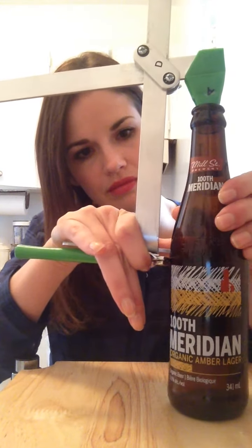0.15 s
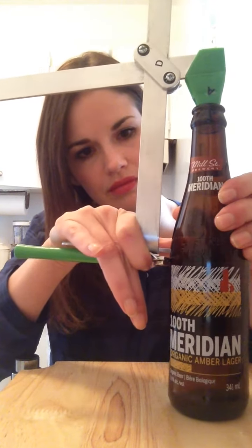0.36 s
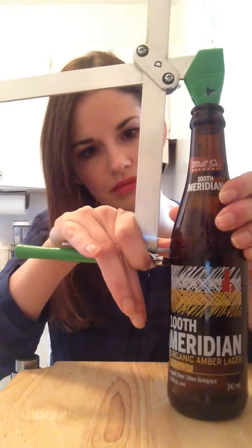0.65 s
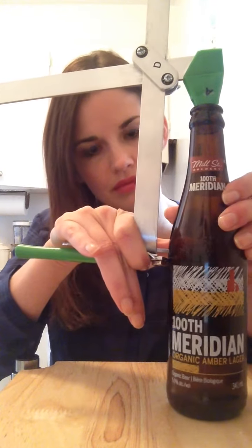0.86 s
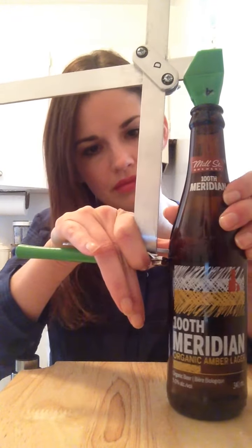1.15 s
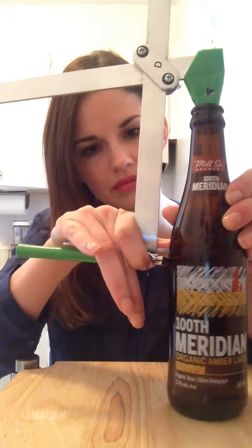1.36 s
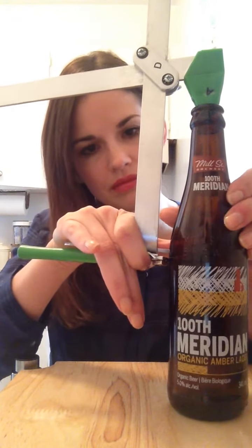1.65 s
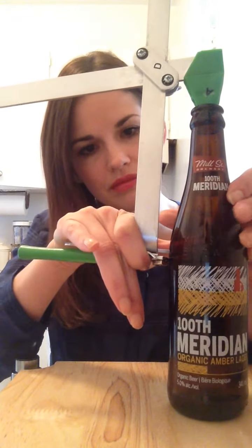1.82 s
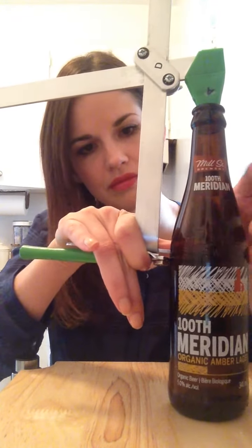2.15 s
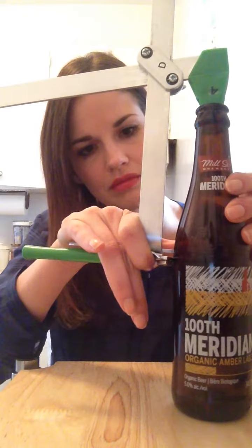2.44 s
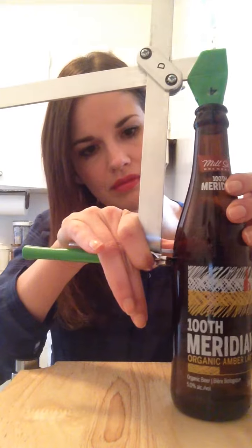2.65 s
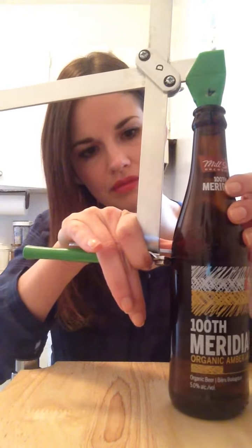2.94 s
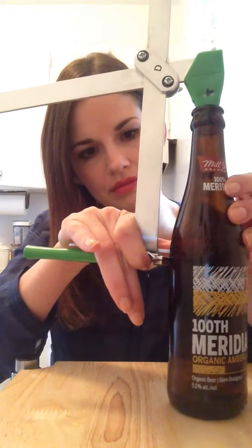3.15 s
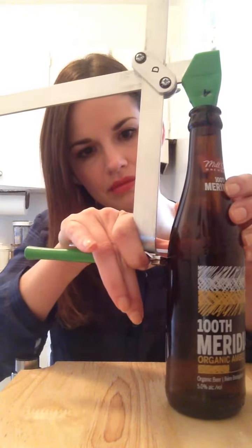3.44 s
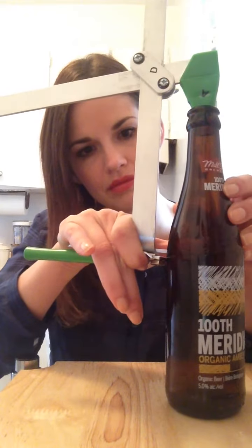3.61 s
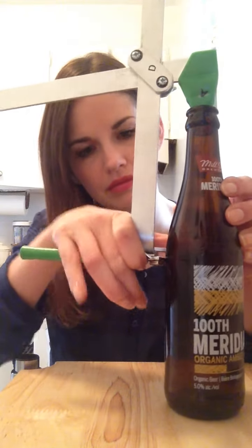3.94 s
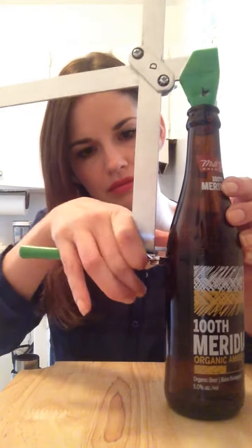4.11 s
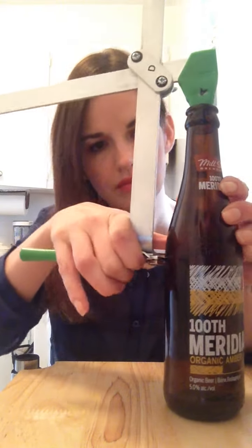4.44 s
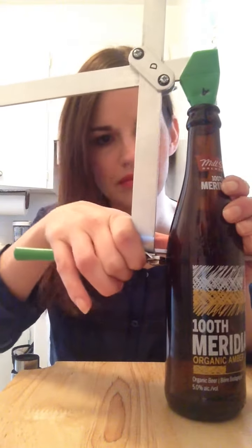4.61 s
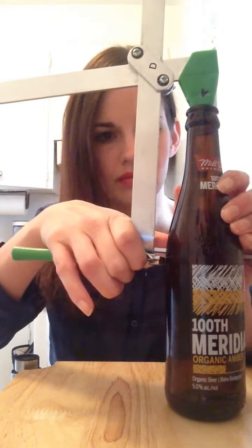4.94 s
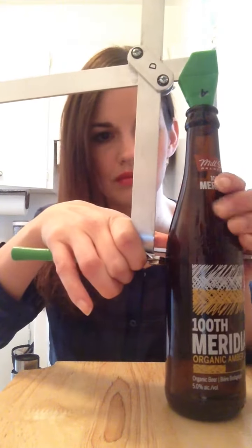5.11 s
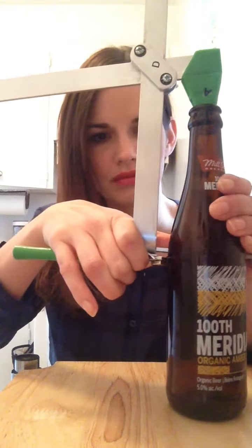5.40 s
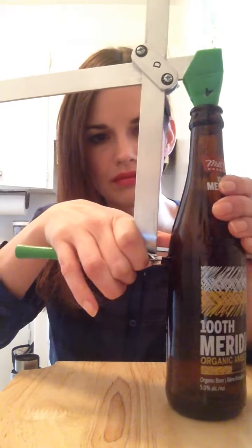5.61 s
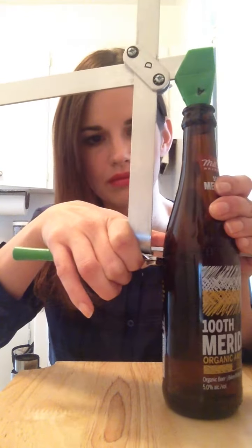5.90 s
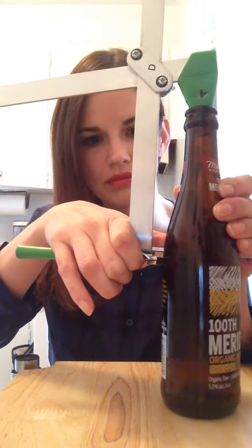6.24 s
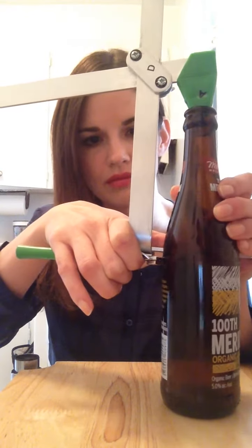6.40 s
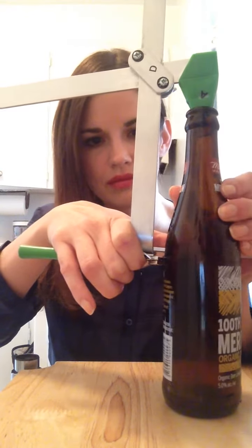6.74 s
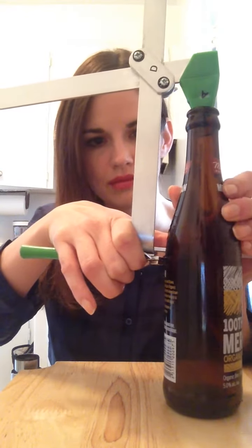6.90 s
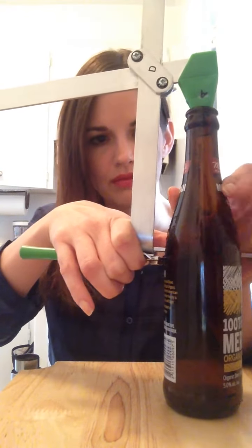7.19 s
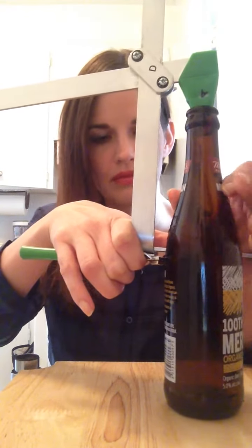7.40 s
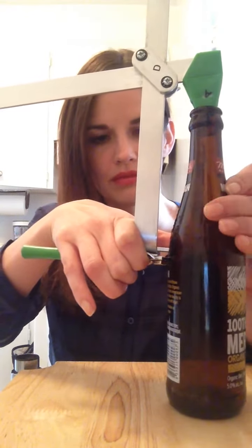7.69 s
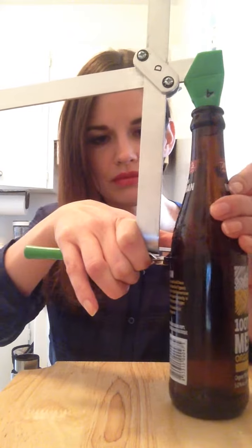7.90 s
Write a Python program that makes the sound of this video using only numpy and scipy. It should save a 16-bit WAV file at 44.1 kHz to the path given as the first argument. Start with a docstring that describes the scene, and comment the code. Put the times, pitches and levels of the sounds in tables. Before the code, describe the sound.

A quiet small room holds a steady low hum, around 175 Hz, with soft dull air. At 0.4 s there is a barely audible tick; at 0.75-0.9 s a tight cluster of bright, brittle glass cracks and gritty crunch, as the wheel scores the bottle. A second short crunch comes at 1.3-1.5 s with a dull wooden bump, then faint finger swishes, small bumps and dry joint ticks until 4 s. At 4.26 s a quick grind leads into a loud, sharp clink at 4.3 s, metal arm on glass, ringing briefly with a hissy shimmer. Small ticks follow at 4.55 s and 5.2 s. From 5.6 to 6.4 s irregular crisp chips snap over fine grit; more at 6.6-7.0 s, ending near a dry tick at 7.14 s. Faint swishes and tiny crackles remain until 8 s. Close microphone, short reverberation.

```python
"""In a small room, a glass bottle is turned by hand against the wheel of a bottle cutter on a wooden table.
Each push grinds grit as a random train of grains and breaks out chips: noise cracks that ring the wall's modes.
Once the metal arm snaps against the bottle with a loud clink, made of both sets of modes, a crack and a shimmer.
Faint finger swishes, joint ticks and table bumps are shaped noise; an appliance adds tones and a rush of air.
The recorder's gain ducks on loud sounds, most after the clink, and creeps back."""
import sys
import numpy as np
from scipy import signal
from scipy.fft import rfft, irfft
from scipy.io import wavfile
from scipy.ndimage import uniform_filter1d

SR = 44100
rng = np.random.default_rng(int(sys.argv[2]) if len(sys.argv) > 2 else 0)


def bounce(signal):
    """Save signal as a 16-bit WAV file at the path given by the first command-line argument."""
    frames = np.transpose(np.atleast_2d(signal))
    limited = np.clip(frames, -1, 1)
    pcm = np.round(limited * 32767).astype(np.int16)
    wavfile.write(sys.argv[1], SR, pcm)


N = 355446
TIME = np.arange(N) / SR
RING_TIME = TIME[:SR // 4]


def from_db(db):
    """Level: amplitude gain is ten to the power of decibels over twenty."""
    return 10 ** (np.asarray(db) / 20)


def rms_one(x):
    """Normalisation: scale a signal to unit rms."""
    return x / np.sqrt(np.mean(x ** 2) + 1e-20)


def at_hz(points, hz):
    """Interpolation on a logarithmic frequency axis."""
    table_hz, value = np.transpose(points)
    return np.interp(np.log(np.maximum(hz, 1)), np.log(table_hz), value)


def filtered(x, edge_hz, kind, order=2):
    """Causal Butterworth filtering: a maximally flat passband."""
    edge_hz = np.clip(edge_hz, 10, .45 * SR)
    return signal.sosfilt(signal.butter(order, edge_hz, kind, fs=SR, output="sos"), x)


def noise(spectrum, size, resonances=()):
    """Spectral shaping: white noise coloured by a spectrum and lifted at each resonance; rms 1."""
    hz = np.fft.rfftfreq(size, 1 / SR)
    power = 1
    for centre_hz, width_hz, lift_db in resonances:
        power = power + (from_db(lift_db) ** 2 - 1) / (1 + (2 * (hz - centre_hz) / width_hz) ** 2) ** 2
    white = rfft(rng.standard_normal(size))
    return rms_one(irfft(white * from_db(at_hz(spectrum, hz)) * np.sqrt(power), size))


def drift(rate_hz):
    """Slow random modulation: straight lines between random knots of spread 1."""
    knots = rng.standard_normal(400)
    return np.interp(TIME * rate_hz, np.arange(len(knots)), knots)


def add(track, s, sound):
    """Superposition: mix a sound into the track at time s."""
    start = int(np.clip(round(s * SR), 0, N - 1))
    track[start:start + len(sound)] += sound[:N - start]


def dying(t60):
    """Exponential decay: the level falls 60 dB in t60."""
    return from_db(-60 * RING_TIME / t60)


def rings(modes, size=None):
    """Modal synthesis: one exponentially dying sine for each mode."""
    t = RING_TIME[:size]
    return np.array([from_db(db - 60 * t / t60) * np.sin(2 * np.pi * hz * t) for hz, db, t60 in modes])


def alternating(modes, size=None):
    """Modal polarity: ringing modes, neighbours swinging in opposite directions."""
    return (-1) ** np.arange(len(modes))[:, None] * rings(modes, size)


def struck(modes, scatter_db, detune):
    """Modal excitation: grip and contact give every mode a slightly different strength and pitch."""
    chance = rng.standard_normal((len(modes), 2))
    varied = [(hz * (1 + detune * a), db + scatter_db * b, t60)
              for (hz, db, t60), (a, b) in zip(modes, chance)]
    return alternating(varied, size=SR // 12)


def crack(spectrum, t60, rise_s=0.):
    """Brittle fracture: tiny breaks and crowded modes as decaying noise; a running crack takes time to swell."""
    swell = 1 - np.exp(-RING_TIME / max(rise_s, 1e-6))
    return noise(spectrum, len(RING_TIME)) * dying(t60) * swell


# Colour of the room air. Each row: frequency in Hz, relative density in dB per Hz.
AIR_SPECTRUM = [(20, -19.5), (45, -9), (70, 0.5), (120, -0.5), (240, -0.5), (400, -1.5), (620, -5.5),
                (900, -8), (1020, -14), (2000, -20), (3200, -29.5), (5500, -36.5), (9000, -39.5),
                (15000, -42)]
# Room resonances stirred by the appliance. Each row: frequency in Hz, width in Hz, lift over the air in dB.
ROOM_RESONANCES = [(88, 12, 5.7), (149.9, 16, 14.35), (174.4, 50, 13.65), (202, 16, 12), (275.8, 28, 8.9),
                   (295.5, 29, 11), (374, 6.7, 2.7), (453, 26, 9.3), (474.6, 40, 4.5), (530, 30, 2.7),
                   (922, 41, 4.6), (1263, 40, 4.8)]
# Tones of the appliance. Each row: frequency in Hz, rms level in dB; both waver.
MOTOR_TONES = [(175.3, -51.5), (354.5, -68.5), (1066, -80.5), (1124, -82.5)]
AIR_DB = -51


def appliance(waver=0.073, wander_hz=0.694, air_waver_db=.5):
    """Tonal and broadband noise: motor tones that waver a little, over air coloured by room resonance."""
    # the wander is that of the first tone; the others keep their frequency ratios to it
    turns = TIME + np.cumsum(wander_hz * drift(4.5)) / SR / MOTOR_TONES[0][0]
    tones = np.zeros(N)
    for hz, db in MOTOR_TONES:
        loudness = from_db(db) * np.sqrt(2) * (1 + waver * drift(5.0))
        tones += loudness * np.sin(2 * np.pi * hz * turns)
    air_level = from_db(AIR_DB + air_waver_db * drift(3.2))
    return tones + air_level * noise(AIR_SPECTRUM, N, ROOM_RESONANCES)


# Fingers slide over the glass to take a new grip.
# Each row: time of the strongest rub in seconds, length in seconds, level in dB.
FINGER_SLIDES = [(1.24, 0.085, -86), (2.008, 0.04, -79), (2.25, .3, -89), (3.99, 0.064, -91),
                 (5.042, 0.073, -75.5), (7.198, 0.13, -79.5), (7.98, 0.15, -91)]


def fingers(low_hz=7000, high_hz=15500):
    """Sliding friction: dry skin on glass gives a faint, high swish."""
    pressure = sum(from_db(db) * np.exp(-(2 * (TIME - s) / length) ** 2) for s, length, db in FINGER_SLIDES)
    return pressure * rms_one(filtered(rng.standard_normal(N), [low_hz, high_hz], "band"))


def touch(peak_db, hz, t60, octaves):
    """Damped impact: a decaying noise burst in a band, so its pitch is vague."""
    edges_hz = hz * 2 ** (octaves * np.array([-.5, .5]))
    burst = filtered(rng.standard_normal(len(RING_TIME)) * dying(t60), edges_hz, "band")
    return from_db(peak_db) * burst / np.abs(burst).max()


# Dry ticks of play in the cutter's joints.
# Each row: start in seconds, peak level in dB, centre in Hz, width in octaves.
TICKS = [(.673, -54, 10500, 1.2), (1.217, -56, 11000, 1.1), (2.094, -53, 7700, 0.83),
         (2.308, -52, 7300, 0.2), (4.118, -56, 9500, 1.2), (4.277, -48.5, 11000, 1.2),
         (4.553, -53.5, 9500, 3.5), (4.561, -48, 10030, 1.84), (5.176, -49.5, 7900, 2.2),
         (5.442, -52, 13080, 1), (7.144, -41, 9880, 1.5), (7.459, -59, 13500, 0.86)]


def joint_ticks(t60=0.0057):
    """Impact in loose joints: quickly damped, dry ticks."""
    out = np.zeros(N)
    for s, db, hz, octaves in TICKS:
        add(out, s, touch(db, hz, t60, octaves))
    return out


# The bottle's base shifts on the table. Each row: start in seconds, peak level in dB, pitch in Hz,
# t60 in seconds, width in octaves, peak level of the wall's ring in dB.
BASE_BUMPS = [(0.815, -46, 570, 0.11, 0.6, -62), (0.850, -48, 593, 0.16, 0.43, -60),
              (1.436, -40, 594, 0.042, 0.39, -59), (1.443, -45, 716, 0.041, 0.28, -57),
              (1.744, -49.5, 584, 0.066, 0.64, -46), (1.824, -49, 1510, 0.034, 0.21, -56.5),
              (2.300, -50, 585, 0.064, 0.69, -58), (4.274, -41.5, 620, 0.11, 0.58, -56.5),
              (4.3005, -26, 573, 0.045, 0.37, -44.5), (4.321, -34.5, 520, 0.019, 0.21, -49.5),
              (6.024, -43.5, 1280, 0.014, 1.4, -41.5), (6.2405, -47.5, 1350, 0.019, 1.3, -50),
              (6.935, -47.5, 695, 0.16, 0.46, -64)]


def table_bumps():
    """Impact on damped wood: dull bumps of the base against the table."""
    out = np.zeros(N)
    for s, db, hz, t60, octaves, _ in BASE_BUMPS:
        add(out, s, touch(db, hz, t60, octaves))
    return out


# Span in which the wheel passes between two places on the wall: start in seconds, end in seconds.
WHEEL_PASSAGE = (1.5, 5.6)


def turned(s):
    """Moving drive point: how far the wheel has come from its first place to its later one, 0-1."""
    return np.interp(s, WHEEL_PASSAGE, [0, 1])


# Modes of the bottle wall. Each row: frequency in Hz, t60 in seconds, level in dB with the wheel at its
# first place, level in dB at its later place, level in dB under the arm's blow.
BOTTLE_MODES = [(2480, .03, -25, -26, -40), (2900, .03, -22, -23, -28), (3784, .05, -12, -14, -6),
                (3880, .04, -7, -11, -6), (3955, .055, 0, 0, 0), (4030, .03, -13, -13, -14),
                (4160, .03, -12, -21, -13), (4400, .03, -22, -16, -18), (4620, .03, -18, -24, -26),
                (4750, .035, -16, -22, -8), (5001, .04, -25, -29, -27), (5560, .03, -15, -15, -25),
                (5750, .02, -19, -19, -22), (6020, .02, -22, -21, -28), (6700, .03, -11, -21, -30),
                (6850, .035, -8, -19, -20), (7030, .035, -8, -17, -22), (7550, .03, -15, -18, -18),
                (7847, .06, -9, -9, -8), (7965, .06, -8, -9, -8), (8280, .02, -8, -14, -24),
                (8480, .02, -11, -14, -26), (8750, .025, -14, -16, -22), (8910, .03, -14, -20, -12),
                (9040, .03, -11, -22, -24), (9580, .03, -15, -14, -26), (9700, .035, -8, -9, -17),
                (9880, .04, -10, -12, -3), (10030, .035, -4, -13, -14), (10230, .03, -9, -5, -12),
                (10410, .035, -20, -7, -5), (10660, .03, -16, -20, -22), (10900, .02, -14, -19, -28),
                (11200, .025, -17, -18, -28), (11620, .025, -25, -17, -28), (12040, .02, -24, -18, -30),
                (12510, .035, -17, -17, -21), (12680, .03, -15, -24, -28), (13400, .025, -14, -19, -23),
                (14000, .025, -17, -15, -21), (14140, .06, -10, -18, -26), (14600, .02, -15, -14, -30),
                (14830, .02, -11, -14, -24), (15050, .035, -9, -9, -15), (15230, .03, -15, -14, -26)]


def wall_modes(turn):
    """Modal coupling: the wheel's place on the wall decides how strongly it drives each mode."""
    return [(hz, first_db + turn * (later_db - first_db), t60)
            for hz, t60, first_db, later_db, _ in BOTTLE_MODES]


def jolts(contact_hz=4550):
    """Soft-contact excitation: the wall answers each bump of its base, mostly with its lowest modes."""
    out = np.zeros(N)
    ring = filtered(rings(wall_modes(1)).sum(axis=0), contact_hz, "low", order=4)
    for s, *_, ring_db in BASE_BUMPS:
        add(out, s, from_db(ring_db) * ring / np.abs(ring).max())
    return out


# Modes of the cutter's metal arm, the weak ones ringing on.
# Each row: frequency in Hz, relative level in dB, t60 in seconds.
ARM_MODES = [(509.4, -31, 0.07), (1150, -21.5, 0.05), (1640, -26.5, .03), (1931, -18.5, 0.024),
             (2363, -22, 0.036), (2520, -23, .03), (2750, -22.5, 0.034), (3100, -24, 0.045),
             (3480, -24, .025), (3780, -29, .3), (3840, -27.5, .22), (4000, -8, 0.024),
             (4020, -11.5, 0.019), (4330, -15.5, 0.022), (4770, -38.5, .18), (4990, -41, .2),
             (7656, -20, .025), (8570, -22, .022), (9800, -30.5, .14), (10400, -29.5, 0.15)]
# Colour of the crack of the arm's blow. Each row: frequency in Hz, relative density in dB per Hz.
BLOW_SPECTRUM = [(50, -62), (280, -19.5), (560, -7.5), (1400, -3.5), (1950, -2), (2500, -1), (3000, -3),
                 (3600, -5), (3800, 10), (4300, 5.5), (4750, -0.5), (5100, -13), (5700, -11.5),
                 (6450, -21.5), (7100, -8.5), (8000, -3), (8500, -10), (10300, -3), (11200, -18),
                 (15000, -11)]
# Crowded weak modes of glass and metal, fading together as a hiss.
# Each row: frequency in Hz, relative density in dB per Hz.
SHIMMER_SPECTRUM = [(500, -13.5), (1500, -4), (2500, 0), (3100, 2), (3550, 1.5), (3860, 19), (4200, 7.5),
                    (4500, 0.5), (4850, 6.5), (5500, -8.5), (6400, -12), (7200, 1.5), (9000, -1.5),
                    (10200, 2.5), (11400, -14), (12600, -3), (15000, -8.5)]
CLINK_S, CLINK_ARM_DB, CLINK_BOTTLE_DB, CLINK_CRACK_DB = 4.2993, -8, -10.5, -14
SHIMMER_DB, SHIMMER_T60_S = -30, 0.21


def clink():
    """Impact of two resonators: the arm snaps on the bottle with a crack, both rings and a fading shimmer."""
    wall = alternating([(hz, blow_db, t60) for hz, t60, *_, blow_db in BOTTLE_MODES]).sum(axis=0)
    arm = rings(ARM_MODES).sum(axis=0)
    body = from_db(CLINK_BOTTLE_DB) * wall + from_db(CLINK_ARM_DB) * arm
    burst = from_db(CLINK_CRACK_DB) * crack(BLOW_SPECTRUM, t60=0.03)
    shimmer = from_db(SHIMMER_DB) * crack(SHIMMER_SPECTRUM, SHIMMER_T60_S, rise_s=.004)
    out = np.zeros(N)
    add(out, CLINK_S, body + burst + shimmer)
    return filtered(out, 400, "high")   # the clink carries no low thump


# The hand turns the bottle in separate pushes.
# Each row: start in seconds, length before the decay in seconds, grit level in dB, rise in seconds.
HAND_PUSHES = [(0.433, 0.018, -78.5, .008), (0.789, 0.079, -53, 0.026), (1.19, 0.15, -76.5, 0.03),
               (1.415, 0.061, -62, 0.015), (1.646, 0.11, -75.5, 0.048), (3.938, 0.088, -75, 0.022),
               (4.261, 0.078, -44, 0.04), (5.41, 0.019, -68.5, 0.014), (5.598, 0.9, -70, 0.029),
               (5.76, 0.039, -63, .02), (5.86, 0.047, -61, 0.035), (6.55, 0.45, -73, 0.061),
               (6.901, 0.047, -64, 0.012), (7.715, 0.33, -78, 0.25)]
PUSH_T60_S = 0.044   # the wheel comes to rest


def pushing():
    """Envelope of the driving force: each push rises, holds and dies away."""
    strength = np.zeros(N)
    for s, length, db, rise in HAND_PUSHES:
        fall_db = -60 * np.maximum(TIME - s - length, 0) / PUSH_T60_S
        strength += from_db(db + fall_db) * np.clip((TIME - s) / rise, 0, 1)
    return strength


# Colour of the crack of breaking glass. Each row: frequency in Hz, relative density in dB per Hz.
GLASS_SPECTRUM = [(800, -7.5), (2400, -8.5), (3500, -11.5), (3900, -3), (4750, -2.5), (5280, -11),
                  (5650, -2.5), (6400, -7), (7000, -1), (8400, -1), (10300, 3), (11300, -3), (13500, 1.5),
                  (15000, 4.5)]


def glass_crack(t60, rise_s=0.):
    """Brittle fracture of glass: a burst with the colour of breaking glass."""
    return crack(GLASS_SPECTRUM, t60, rise_s)


# a harder push crushes more grains: their rate at that grit level, and its power law
GRAINS_PER_S, GRAINS_AT_DB, GRAINS_FOLLOW = 1000, -68.5, 0.71


def grit(size_db=0.5, crack_db=-2):
    """Random impulse excitation: crushed grains tick singly under a light push and crunch under a hard one."""
    strength = pushing()
    rate = GRAINS_PER_S * (strength / from_db(GRAINS_AT_DB)) ** GRAINS_FOLLOW
    chance = np.clip(rate / SR, 1e-6, 1)   # per sample
    sizes = rms_one(from_db(size_db * np.minimum(rng.exponential(1, N), 4)))
    hits = (rng.random(N) < chance) * rng.choice([-1, 1], N)
    grains = hits * sizes * strength / np.sqrt(chance)   # grain power follows the push at any rate
    fracture = from_db(crack_db) * glass_crack(t60=0.024)
    out = np.zeros(N)
    for turn, share in enumerate([1 - turned(TIME), turned(TIME)]):
        wall = alternating(wall_modes(turn)).sum(axis=0) + fracture
        out += signal.fftconvolve(grains * share, wall / np.linalg.norm(wall))[:N]
    return out


# weaker fractures trail each chip within a moment; their gain is scaled by a random factor of -2 to 2
SPLINTER_S, SPLINTER_DB, SPLINTERS = 0.004, -22.5, 3


def splintered(x):
    """Secondary fracture: faint delayed copies stand for splinters that follow at random."""
    out = x.copy()
    for when, factor in rng.uniform([0, -2], [1, 2], (SPLINTERS, 2)):
        lag = 1 + int(when * SPLINTER_S * SR)
        out[lag:] += from_db(SPLINTER_DB) * factor * x[:-lag]
    return out


# The wheel cracks the glass. Each row: start in seconds, level of the treble in dB before a lift common
# to all chips, level of the low ring in dB; both are rms levels over the first 10 ms.
GLASS_CHIPS = [(0.44, -82, -76), (0.7272, -68.5, -69.5), (0.765, -62, -62), (0.7823, -45.5, -44),
               (0.794, -46.5, -49), (0.8105, -48, -49), (0.8313, -51, -49), (0.8359, -48, -55),
               (0.847, -45.5, -46.5), (0.8577, -50, -57), (0.863, -58, -61), (0.8741, -53.5, -60),
               (1.304, -72, -75), (1.373, -53, -54), (1.414, -68, -69), (1.4307, -41.5, -46),
               (1.45, -50, -59), (1.4718, -48.5, -49), (1.5135, -70, -70), (5.419, -85, -75),
               (5.6006, -49, -52.5), (5.638, -53.0, -52), (5.662, -65, -74), (5.681, -69.5, -71),
               (5.717, -67, -67), (5.7329, -55.5, -63), (5.7645, -50.5, -50.5), (5.774, -52.5, -51),
               (5.797, -48, -47), (5.827, -71, -65), (5.8479, -55.5, -51.5), (5.8604, -51, -56),
               (5.8811, -54, -48), (5.894, -48.5, -50.5), (5.899, -51, -61), (5.958, -59, -56),
               (5.99, -65, -61), (6.0066, -70, -68), (6.031, -74, -72), (6.061, -52, -50),
               (6.079, -63, -71.0), (6.107, -47, -52), (6.113, -49.5, -60), (6.1552, -67, -63),
               (6.197, -55, -52.5), (6.2433, -59.5, -54), (6.262, -48, -48), (6.273, -58, -73),
               (6.3186, -56, -54), (6.336, -57.5, -57), (6.3919, -49.5, -50), (6.445, -76, -77.5),
               (6.621, -66, -67), (6.633, -55, -57), (6.6664, -47.5, -50.5), (6.7155, -60, -65),
               (6.7557, -68, -68), (6.782, -55, -54.5), (6.8138, -53.5, -54.5), (6.8478, -66, -69),
               (6.871, -68, -68), (6.8845, -45.5, -45.5), (6.901, -50.5, -52.5), (6.932, -52.5, -54.5),
               (6.9693, -53.5, -51.5), (7.0131, -70.5, -69.5), (7.231, -81, -74), (7.741, -85, -76),
               (7.813, -79, -72), (7.938, -72, -80), (7.949, -76, -83), (7.9825, -70.5, -68.5),
               (7.998, -69, -70), (8.047, -74, -79.5)]


def chips(crack_db=-4, crack_t60=0.047, snap_db=6, snap_t60=0.0055, treble_db=3, rise_s=.0002):
    """Fracture driving modes: each chip rings the bottle in its own balance; the tone shifts with turning."""
    out, attack = np.zeros(N), SR // 100
    is_low = np.array(BOTTLE_MODES)[:, 0] < 5200
    for s, high_db, low_db in GLASS_CHIPS:
        ring = struck(wall_modes(turned(s)), scatter_db=3.5, detune=0.0026)
        snap = from_db(snap_db) * glass_crack(snap_t60, rise_s)   # the dry first instant of the break
        fracture = snap + from_db(crack_db) * glass_crack(crack_t60, rise_s)
        low = splintered(ring[is_low].sum(axis=0))
        high = splintered(ring[~is_low].sum(axis=0) + fracture[:ring.shape[1]])
        add(out, s, from_db(low_db) * low / low[:attack].std())
        add(out, s, from_db(high_db + treble_db) * high / high[:attack].std())
    return out


# The room's decay. Each row: frequency in Hz, t60 in seconds.
ROOM_DECAY = [(300, .32), (2000, .28), (4000, .26), (8000, .24), (15000, .2)]


def room(x, wet_db, first_echo_s=0.0044):
    """Reverberation: diffuse reflections that die sooner in the treble."""
    t, edges_hz = TIME[:SR // 2], np.geomspace(150, 19000, 8)
    tail = np.zeros(len(t))
    for low, high in zip(edges_hz, edges_hz[1:]):
        fall = from_db(-60 * t / at_hz(ROOM_DECAY, np.sqrt(low * high)))
        tail += filtered(rng.standard_normal(len(t)), [low, high], "band") * fall * (t > first_echo_s)
    tail /= np.sqrt(np.sum(tail ** 2))
    return x + from_db(wet_db) * signal.fftconvolve(x, tail)[:N]


def scene():
    """Direct and reverberant sound: scoring and clink close to the microphone, the hum all around."""
    scoring = chips() + grit()
    contacts = joint_ticks() + table_bumps() + jolts()
    close = room(scoring + contacts, wet_db=-15.0) + room(clink(), wet_db=-18.0)
    return (close + fingers() + appliance())[None]


def record(dry, threshold_db=-30, slope=0.19, release_db_per_s=2.0, cutoff_hz=15300):
    """Dynamic range compression: gain ducks on a loud sound and recovers slowly; the top is cut."""
    level_db = 10 * np.log10(np.maximum(uniform_filter1d(dry[0] ** 2, size=256), 1e-12))
    excess_db = slope * np.maximum(level_db - threshold_db, 0)
    # a running maximum on a rising ramp holds each duck while it recovers at the release rate
    ramp_db = release_db_per_s * TIME
    duck_db = np.maximum.accumulate(excess_db + ramp_db) - ramp_db
    top_cut = signal.ellip(10, .2, 70, cutoff_hz, fs=SR, output="sos")
    return signal.sosfilt(top_cut, dry * from_db(-duck_db))


dry = scene()
out = record(dry)
bounce(out)
```